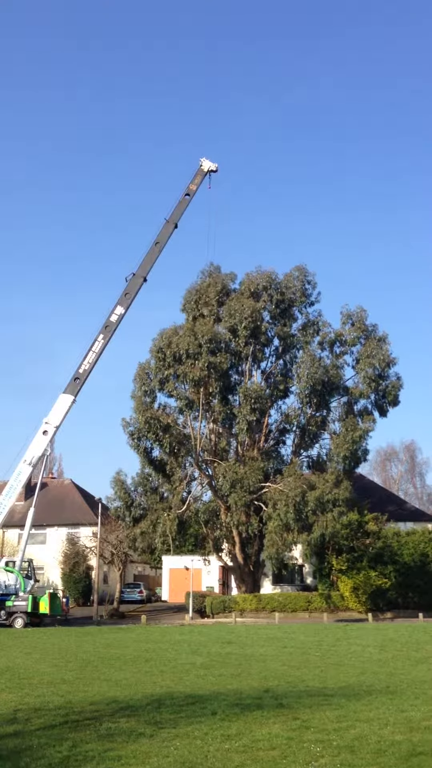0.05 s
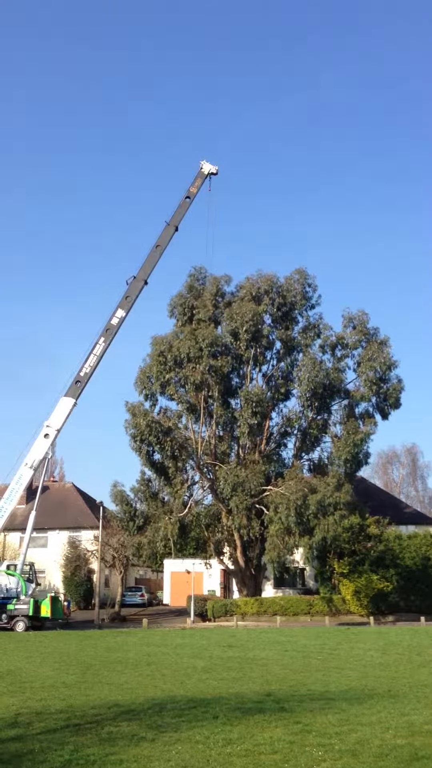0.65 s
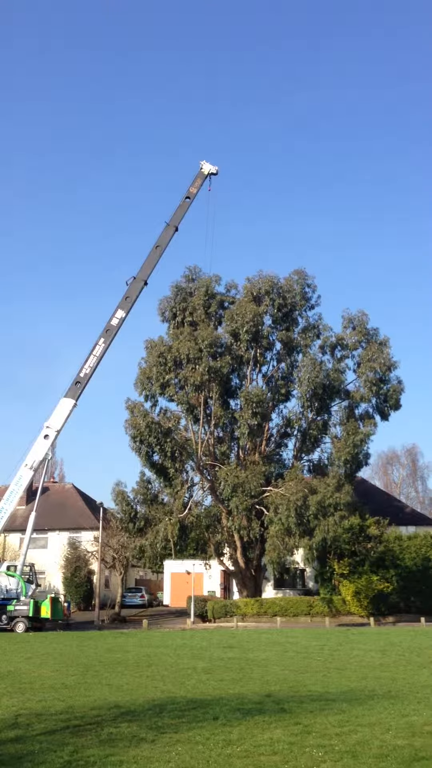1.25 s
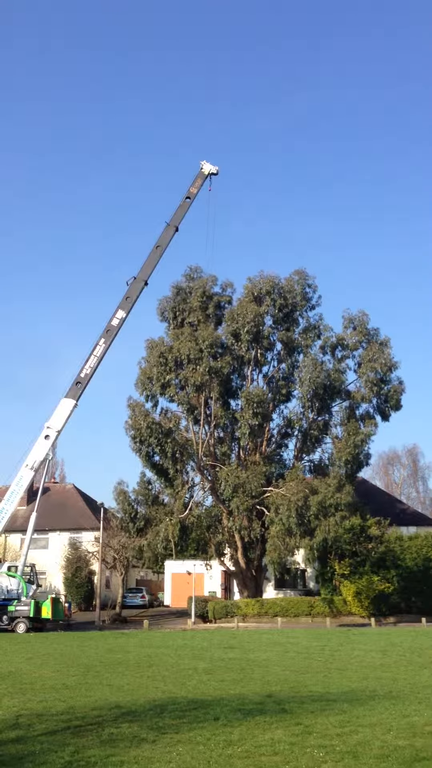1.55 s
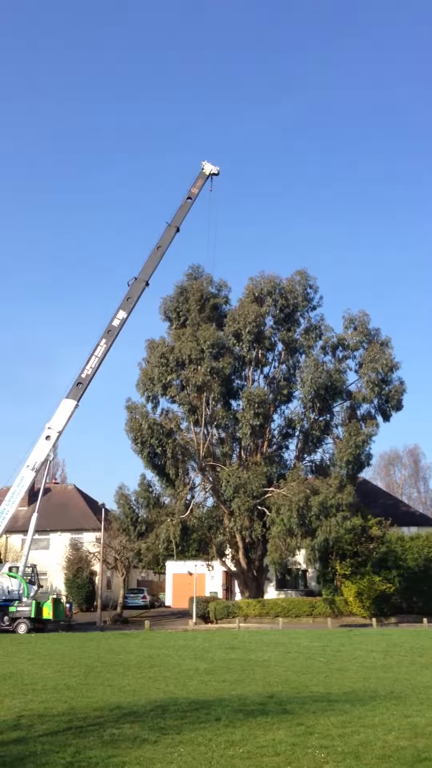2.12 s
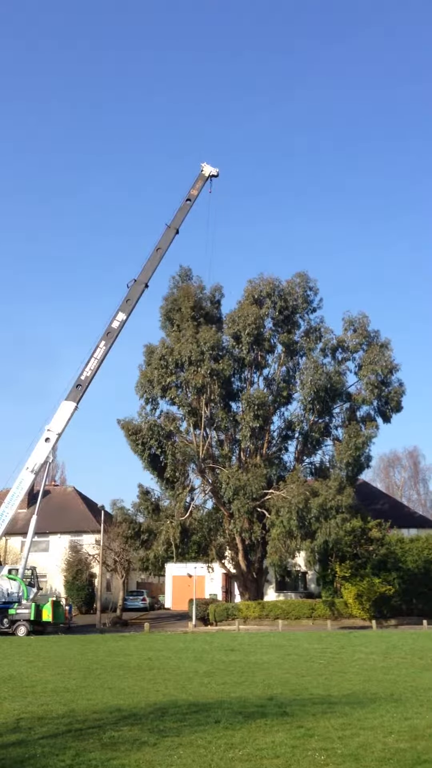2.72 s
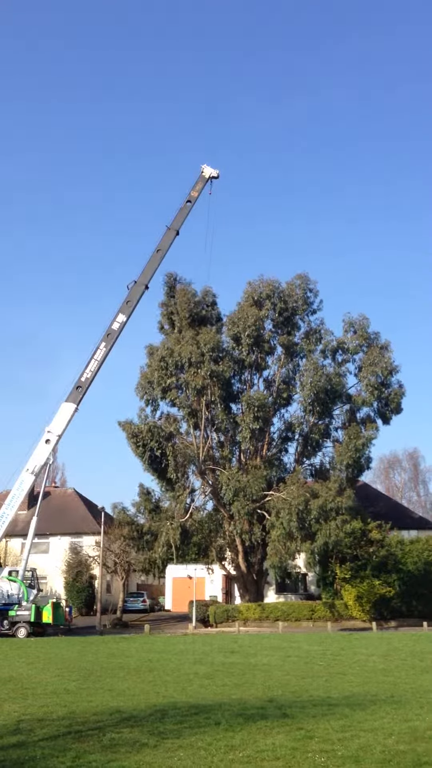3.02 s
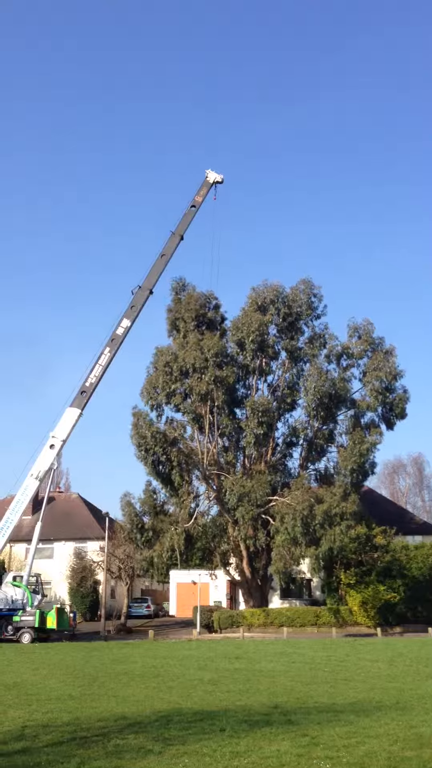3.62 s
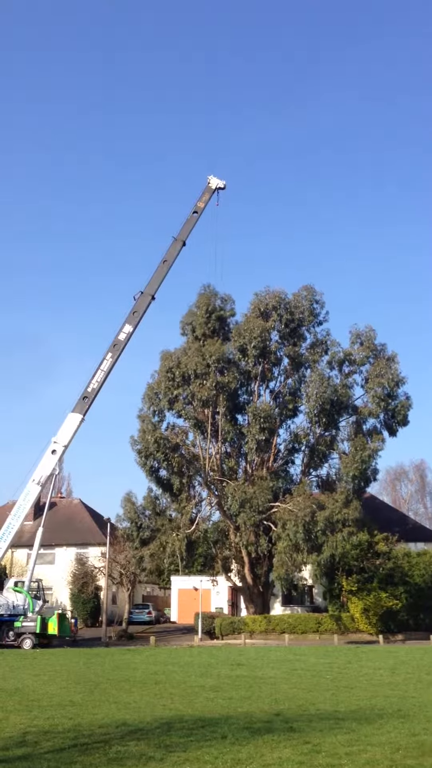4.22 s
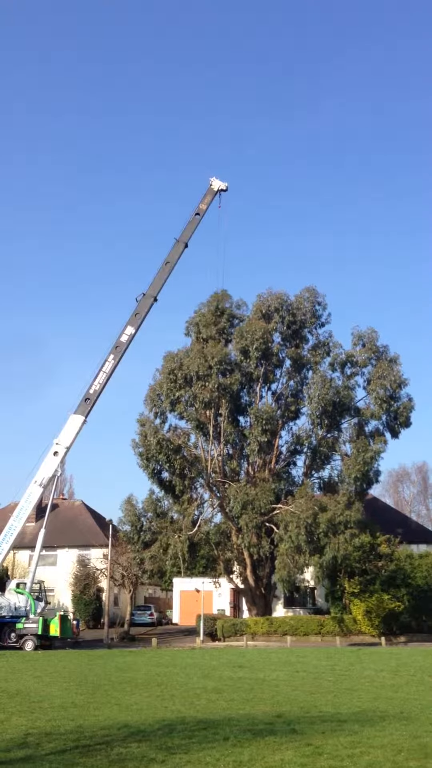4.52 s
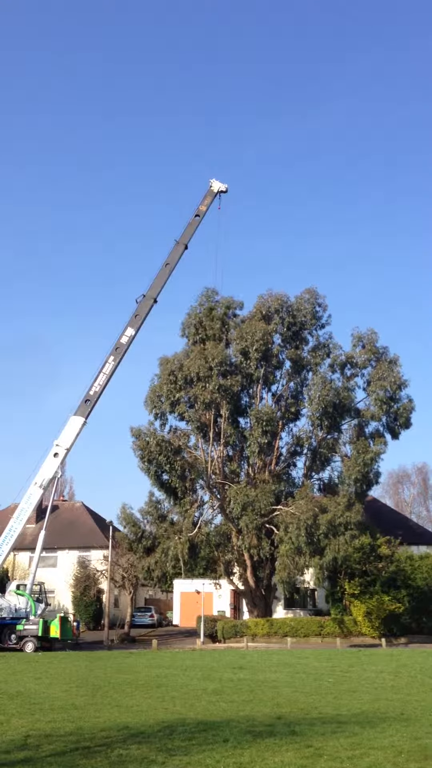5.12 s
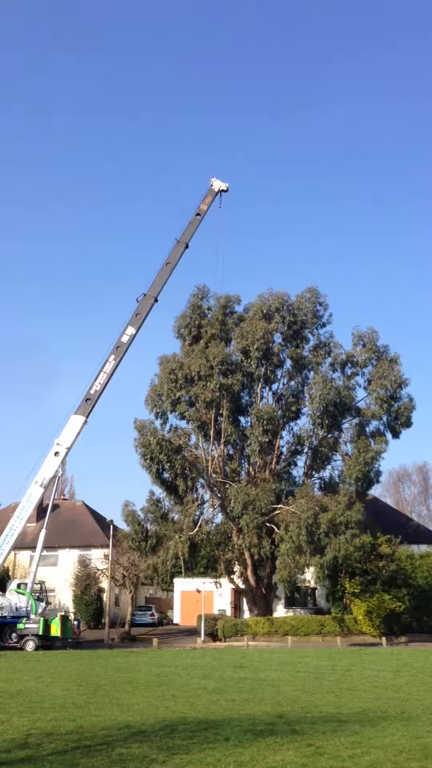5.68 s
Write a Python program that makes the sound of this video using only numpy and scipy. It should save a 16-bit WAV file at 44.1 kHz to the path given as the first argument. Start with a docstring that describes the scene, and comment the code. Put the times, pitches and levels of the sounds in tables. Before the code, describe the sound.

Two diesel engines, a crane's and a smaller one, run steadily throughout, heard across a lawn as a quiet, low, slightly beating hum with light clatter. From the start a distant chainsaw hisses faintly in the cut. Small dry twigs snap at about 0.5 and 1 second, and a soft scuff like a footstep comes at 1.3 seconds. At about 2 seconds a tree limb breaks with one sharp double crack, by far the loudest sound, its second part duller, with a short echo from house fronts. The saw dies away by about 2.5 seconds. More twigs snap with brief rustles around 2.2 and 2.4 seconds, then a faint rustle at 3.2 and a last snap at 3.4. Faint low puffs of air bump the microphone now and then, including near 1.2, 3 and 5 seconds. The engines continue unchanged to the end, near 5.5 seconds.

```python
"""A tree limb breaks with one sharp double crack, heard across a lawn; the house fronts throw it back.
Two diesel engines, the crane's and a smaller one, run steadily and beat against each other.
A far saw hisses in the cut and runs down once the limb has let go.
Twigs snap among brief rustles and a soft scuff like a footstep; puffs of air bump the microphone."""
import sys
import numpy as np
from scipy import signal
from scipy.fft import rfft, irfft, next_fast_len
from scipy.io import wavfile
from scipy.ndimage import map_coordinates

SR = 44100
rng = np.random.default_rng(int(sys.argv[2]) if len(sys.argv) > 2 else 0)


def master_out(mix):
    """Clip the mix to full scale and print it as 16-bit PCM to the path in sys.argv[1]."""
    frames = np.transpose(np.atleast_2d(mix))
    ceiling = np.clip(frames, -1, 1)
    pcm = np.round(ceiling * 32767).astype(np.int16)
    wavfile.write(sys.argv[1], SR, pcm)


N = 253575
TIME = np.arange(N) / SR


# the limb's first break, from across the lawn: (frequency [Hz], relative level [dB])
SPLIT_SPECTRUM = [(60, -57), (110, -26.5), (180, -7), (270, -4), (420, -7), (650, 1.5), (820, -4.5),
                  (980, 6.5), (1130, -2.5), (1450, 3.5), (1900, 0.5), (2400, 5.5), (2900, -7), (4400, -6.5),
                  (5200, -12.5), (8500, -12.5), (11000, -22), (15000, -41)]
# the duller second break, at the hinge of wood: (frequency [Hz], relative level [dB])
HINGE_SPECTRUM = [(50, -52), (180, -17), (400, -20), (800, -12), (1550, 4.5), (2100, -1.5), (2500, -10),
                  (3050, -2), (3700, -21), (5500, -37), (15000, -67)]
# the crack scattered by foliage and houses: (frequency [Hz], relative level [dB])
SCATTER_SPECTRUM = [(60, -28), (180, 11), (300, -1.5), (450, -7.5), (980, 0), (1550, -3), (2200, -2.5),
                    (3000, -5.5), (5000, -14.5), (8000, -20.5), (11000, -29.5), (15000, -47)]

def limb(split_s=1.9624, hinge_s=2.0207):
    """Across the lawn the limb splits, the trunk thuds, and the last hinge of wood creaks and parts."""
    burst = 1.25 * snap(split_s, t60=0.046, click=0)
    burst += tearing(split_s + .0001, gap_s=0.0011, first=9.5, shrink=0.64)
    split = amp(-13) * struck(burst, SPLIT_SPECTRUM)
    thud_time = TIME - split_s - .009
    thud = amp(-23.5) * np.sin(2 * np.pi * 212 * thud_time) * np.exp(-(thud_time / 0.0062) ** 2)
    creak = amp(-2.5) * snap(hinge_s - .0025, t60=0.02, click=1)
    hinge = amp(-19) * struck(snap(hinge_s, t60=0.013, click=18) + creak, HINGE_SPECTRUM)
    # foliage scatters both breaks quickly; the houses hold a longer, faint tail
    foliage = amp(-23.8) * fade(split_s + 0.0041, t60=0.17) + amp(-35) * fade(hinge_s, t60=0.16)
    tail = amp(-37) * fade(split_s + 0.01, t60=1.0)
    return split + thud + hinge + house_echoes(hinge) + (foliage + tail) * noise(SCATTER_SPECTRUM)


def snap(start_s, t60, click):
    """One sharp release followed by a short burst of tearing fibres."""
    fibres = rng.standard_normal(N) * fade(start_s, t60)
    fibres[round(start_s * SR)] += click
    return fibres


def tearing(start_s, gap_s, first, shrink, count=10):
    """Bundles of fibres let go in quick succession, each weaker than the last."""
    bundle = np.arange(count)
    times = start_s + gap_s * (bundle + 0.11 * rng.standard_normal(count))
    return np.bincount(np.round(times * SR).astype(int), first * shrink ** bundle, N)


# a nearer and a farther house front answer the crack: (delay [s], relative level [dB])
HOUSE_FRONTS = [(0.039, -11.5), (0.13, -21)]

def house_echoes(x):
    """Echoes from the house fronts, dulled and smeared by eaves and hedges."""
    smear = rng.standard_normal(SR // 20) * fade(0, t60=0.052)[:SR // 20]
    spread = signal.fftconvolve(x, smear / np.linalg.norm(smear))[:N]

    def reflections(f):
        return sum(amp(db) * np.exp(-2j * np.pi * f * delay) for delay, db in HOUSE_FRONTS)
    return filtered(spread, lambda f: reflections(f) / (1 + 1j * f / 2500))


# exhaust tones of the idling crane: (multiple of the cycle rate, level [dB])
CRANE_ORDERS = [(6, -69.5), (9, -59), (10, -70), (12, -54.5), (13, -58.5), (14, -72), (15, -58.5),
                (16, -60), (17, -56.5), (18, -77.5), (19, -64)]
# exhaust tones of the smaller, faster diesel: (multiple of the cycle rate, level [dB])
SMALL_ORDERS = [(5, -63.5), (6, -61), (7, -55), (8, -67), (9, -54), (10, -60), (12, -61), (13, -60.5),
                (15, -61.5), (23, -77), (27, -88), (28, -73), (29, -75), (33, -68), (35, -64), (36, -73)]
# steady, slightly wavering engine hums: (frequency [Hz], level [dB])
ENGINE_HUMS = [(218.7, -60.5), (425, -70.5), (173.8, -60)]
# rumble of uneven combustion in the exhausts: (frequency [Hz], relative level [dB])
RUMBLE_SPECTRUM = [(25, -26), (60, -21), (95, -30), (135, -6), (165, -6.5), (190, 4), (225, -6), (265, -12),
                   (320, -5.5), (400, -19), (600, -36), (1500, -49.5)]

def engines(crane_hz=12.4, small_hz=20.07):
    """Two diesels at constant load over the lawn: beating exhaust tones, hums, rumble and clatter."""
    crane, small = cycles(crane_hz, hunt=0.00056), cycles(small_hz, hunt=.0013)
    tones = drone(crane, CRANE_ORDERS, waver_db=1.5) + drone(small, SMALL_ORDERS, waver_db=2.24)
    hums = sum(drone(cycles(hz, hunt=0.0019), [(1, db)], waver_db=4) for hz, db in ENGINE_HUMS)
    # unequal cylinders make the rumble chug once a cycle
    chug = pulsing(small, sharp=0.27) * pulsing(crane, sharp=0.14)
    throb_db = 1.5 * wobble(per_s=4)
    rumble = amp(-49 + throb_db) * noise(RUMBLE_SPECTRUM) * chug
    return tones + hums + rumble + detours(block_clatter(crane, small), echo_db=-13)


def drone(turns, orders, waver_db):
    """Engine harmonics, each wavering on its way over the lawn."""
    tones = np.zeros(N)
    for order, db in orders:
        level_db = db + waver_db * wobble(per_s=4.056)
        tones += amp(level_db) * np.sin(2 * np.pi * (order * turns + rng.random()))
    return np.sqrt(2) * tones


# clatter of the engine blocks: (frequency [Hz], relative level [dB])
CLATTER_SPECTRUM = [(200, -8.5), (370, -5.5), (500, -6), (800, -6.5), (1000, -7), (1150, -9), (1450, -8),
                    (2000, -8), (2900, -10), (3600, -14), (5200, -18.5), (5800, -21.5), (8400, -27.5),
                    (10500, -32.5), (15300, -34.5)]
# narrow rings of the engine casings: (frequency [Hz], width [Hz], relative level [dB])
CASING_MODES = [(707, 38, -1), (927, 98, 0), (2366, 33, -6), (5350, 130, -13), (6800, 160, -11),
                (7510, 86, -13), (9300, 200, -18.5)]

def block_clatter(crane_turns, small_turns, crossover_hz=1800):
    """At each firing the small engine knocks in the middle band and the crane's injectors tick above."""
    knock = noise(CLATTER_SPECTRUM) * pulsing(2 * small_turns, sharp=0.19)
    knock = filtered(knock, lambda f: f / (f + 100) / np.hypot(1, (f / crossover_hz) ** 2))
    tick = noise(CLATTER_SPECTRUM) * pulsing(3 * crane_turns, sharp=0.17)
    tick = filtered(tick, lambda f: 1 / np.hypot(1, (crossover_hz / (f + 1)) ** 2))
    sway_db = 0.4 * wobble(per_s=1.95)  # slow sway in the breeze
    flutter_db = 0.53 * wobble(per_s=12)
    return amp(-52 + sway_db + flutter_db) * unit(knock + tick + amp(-12) * ringing(CASING_MODES))


# hiss of the chain in the cut, from far off: (frequency [Hz], relative level [dB])
SAW_SPECTRUM = [(400, -40), (1250, -24), (1550, 7), (1900, -14), (2400, -8), (3200, 4.5), (4400, 1.5),
                (5800, -7.5), (7200, -6), (10000, -22), (15000, -26)]
# narrow rings of the saw's bar and the trunk: (frequency [Hz], width [Hz], relative level [dB])
SAW_MODES = [(1507, 31, 6.5), (1544, 34, 5), (1670, 53, 6.5), (3560, 90, -7), (4520, 130, 1.5),
             (5330, 140, -6)]

def saw(tooth_hz=185, stop_s=2.25, release_db_per_s=95):
    """The far chain rasps through the wood, its teeth chopping the hiss, then dies away."""
    teeth = pulsing(cycles(tooth_hz, hunt=0.026), sharp=0.12)
    rasp = amp(-3) * noise(SAW_SPECTRUM) * teeth + amp(-5.5) * ringing(SAW_MODES)
    level_db = -56.5 - release_db_per_s * np.maximum(TIME - stop_s, 0)
    flutter_db = 0.55 * wobble(per_s=13)
    return detours(amp(level_db + flutter_db) * rasp, echo_db=-5.5)


# twigs breaking: (time [s], relative level [dB], knock pitch [Hz], knock offset [dB])
TWIG_SNAPS = [(.478, -33.5, 1270, -7), (1.0004, -39, 1500, -18), (2.182, -35, 4000, -20),
              (2.1994, -36, 4000, -12), (2.4438, -29.5, 2080, 0), (3.4393, -30.5, 2380, -8)]
# crackle of a dry twig: (frequency [Hz], relative level [dB])
TWIG_SPECTRUM = [(300, -26), (900, 2), (1700, 1.5), (2200, -9), (2800, 2), (4500, -1), (8000, -9),
                 (15000, -24)]

def twigs():
    """Small dry snaps, each with a woody knock and a short rattle of leaves."""
    out = np.zeros(N)
    for start_s, db, knock_hz, knock_db in TWIG_SNAPS:
        crack = snap(start_s, t60=0.019, click=3)
        rattle = 0.54 * snap(start_s, t60=0.15, click=0)
        crackle = struck(crack + rattle, TWIG_SPECTRUM)
        knock = np.sin(2 * np.pi * knock_hz * (TIME - start_s)) * fade(start_s, t60=0.037)
        out += amp(db - 10.5) * crackle + amp(db + knock_db - 2.5) * knock
    return out


# a soft scuff like a footstep near 1.3 s, and brief rustles: (time [s], level [dB], band centre [Hz])
SCUFF_AND_RUSTLES = [(.485, -57, 3480), (1.288, -49.5, 760), (1.28, -53.5, 3180), (2.24, -52, 1110),
                     (2.48, -51, 1960), (3.2, -59, 2380)]

def scuff_and_rustles():
    """A soft scuff and brief rustles, each a band of noise that rises quickly and fades more slowly."""
    return sum(amp(db) * swell(s, hz, attack_s=.012, release_s=.075) for s, db, hz in SCUFF_AND_RUSTLES)


# air right on the microphone: (time [s], level [dB])
AIR_PUFFS = [(1.205, -60), (1.37, -66), (2.1, -65), (3.02, -61), (4.98, -61)]

def breeze():
    """Light puffs of air hit the microphone, each a low bump."""
    return sum(amp(db) * swell(s, hz=45, attack_s=.015, release_s=.04) for s, db in AIR_PUFFS)


def detours(x, echo_db, count=10):
    """Short detours by ground and house fronts put fixed ripples on a steady sound's spectrum."""
    delays = rng.integers(SR // 500, SR // 40, count)
    return x + amp(echo_db) * sum(np.roll(x, d) for d in delays) / np.sqrt(count)


def amp(db):
    """Decibels to gain."""
    return 10 ** (np.asarray(db) / 20)


def unit(x):
    """Scale to rms 1."""
    return x / np.sqrt(np.mean(x ** 2) + 1e-20)


def gain_at(spectrum, f):
    """Gain of a spectrum table at f, interpolated on a log frequency axis."""
    hz, db = np.transpose(spectrum)
    return amp(np.interp(np.log(f + 1), np.log(hz + 1), db))


def wobble(per_s):
    """A smooth random curve with per_s knots a second."""
    return map_coordinates(rng.standard_normal(int(N * per_s / SR) + 4), [TIME * per_s])


def cycles(hz, hunt):
    """Cycles counted by an engine whose governor hunts slightly."""
    return np.cumsum(hz * (1 + hunt * wobble(per_s=4.95))) / SR


def pulsing(turns, sharp):
    """A gain of rms 1 that peaks once a turn."""
    return unit(np.exp(sharp * np.cos(2 * np.pi * turns)))


def fade(start_s, t60):
    """An envelope that jumps to 1, then falls 60 dB in t60 seconds."""
    return (TIME >= start_s) * np.exp(-np.log(1000) * np.abs(TIME - start_s) / t60)


def filtered(x, response):
    """x through a frequency response."""
    size = next_fast_len(N + SR // 2)
    return irfft(rfft(x, size) * response(np.fft.rfftfreq(size, 1 / SR)), size)[:N]


def noise(spectrum):
    """Coloured noise of rms 1."""
    return unit(filtered(rng.standard_normal(N), lambda f: gain_at(spectrum, f)))


def resonance(f, hz, width):
    """Response of one damped mode."""
    return 1j * f * width / (hz * hz - f * f + 1j * f * width)


def ringing(modes):
    """Noise of rms 1 in a few narrow resonances."""
    white = rng.standard_normal(N)
    return unit(filtered(white, lambda f: sum(amp(db) * resonance(f, hz, w) for hz, w, db in modes)))


def swell(peak_s, hz, attack_s, release_s):
    """A soft burst of noise in one broad band."""
    band = unit(filtered(rng.standard_normal(N), lambda f: resonance(f, hz, 1.1 * hz) ** 2))
    age = TIME - peak_s
    return band * np.exp(-(np.minimum(age, 0) / attack_s) ** 2 - np.maximum(age, 0) / release_s)


def struck(x, spectrum, size=4096):
    """x through a causal colour that keeps white noise at its level."""
    gain = unit(gain_at(spectrum, np.fft.rfftfreq(size, 1 / SR)))
    # minimum phase: nothing rings ahead of the strike
    cepstrum = irfft(np.log(gain + 1e-6))
    cepstrum[1:size // 2] *= 2
    cepstrum[size // 2 + 1:] = 0
    return signal.fftconvolve(x, irfft(np.exp(rfft(cepstrum))))[:N]


def scene():
    """Everything as heard from one spot on the lawn, in mono."""
    return (engines() + saw() + limb() + twigs() + scuff_and_rustles() + breeze())[None]


def record(dry):
    """The microphone loses the deepest bass and keeps nothing above its band limit."""
    low_cut_hz, top_hz = 48, 15400

    def low_cut(f):
        return f ** 2 / (f ** 2 - low_cut_hz ** 2 - 1j * np.sqrt(2) * f * low_cut_hz)
    return filtered(dry[0], lambda f: (f < top_hz) * low_cut(f))[None]


dry = scene()
out = record(dry)
master_out(out)
```